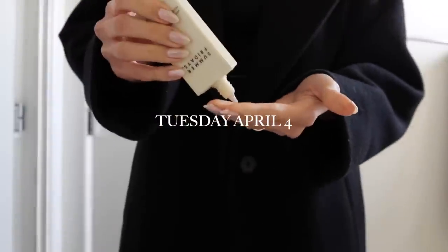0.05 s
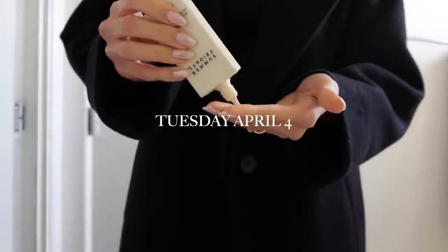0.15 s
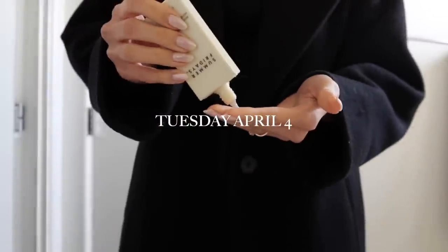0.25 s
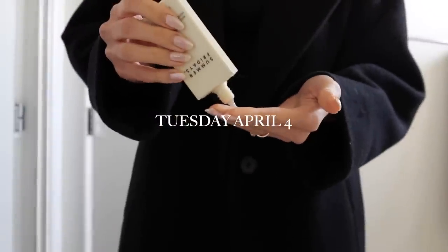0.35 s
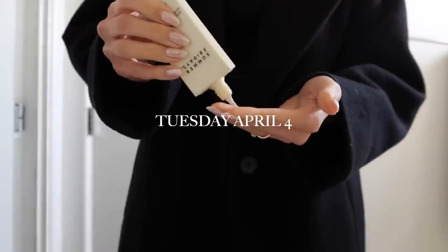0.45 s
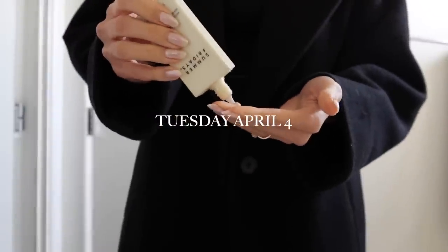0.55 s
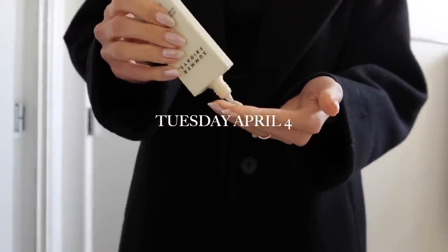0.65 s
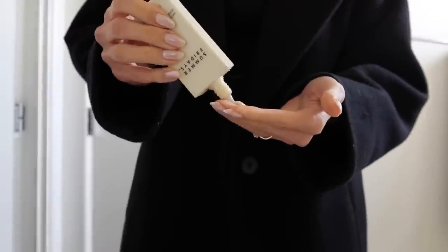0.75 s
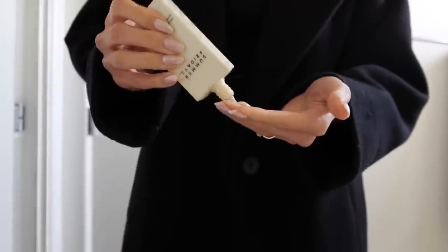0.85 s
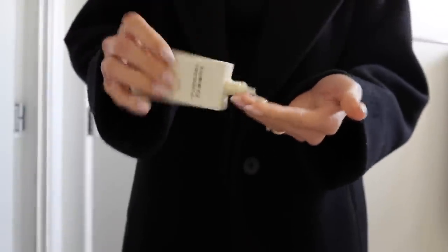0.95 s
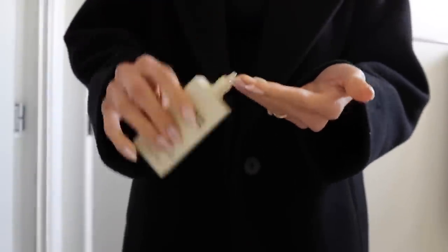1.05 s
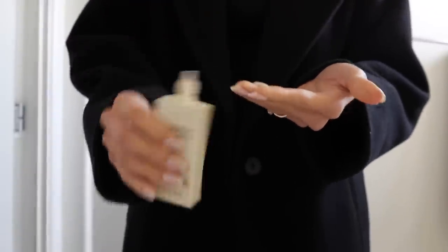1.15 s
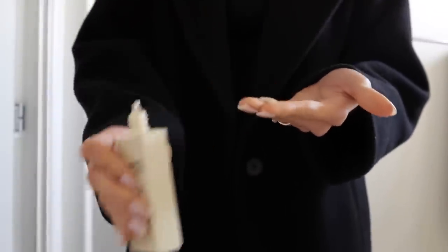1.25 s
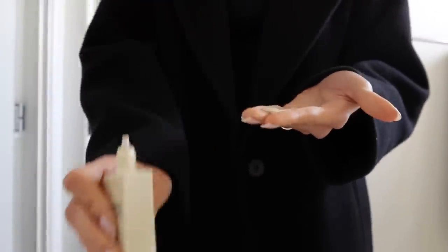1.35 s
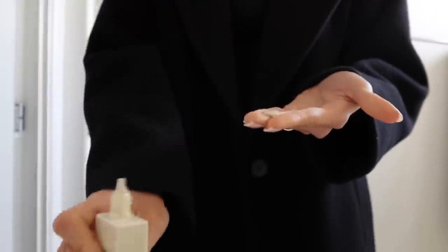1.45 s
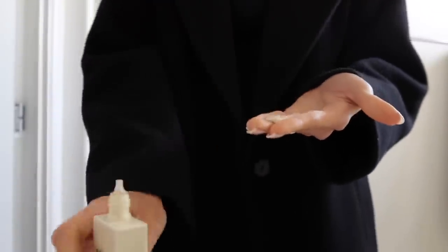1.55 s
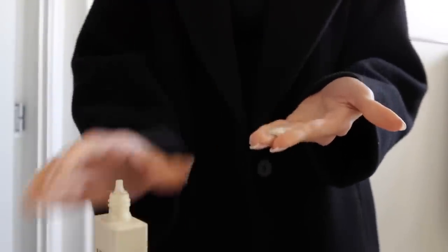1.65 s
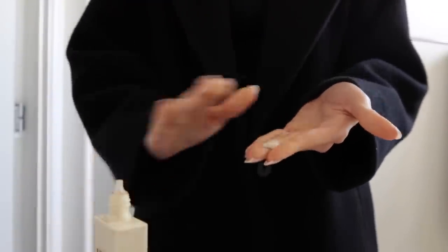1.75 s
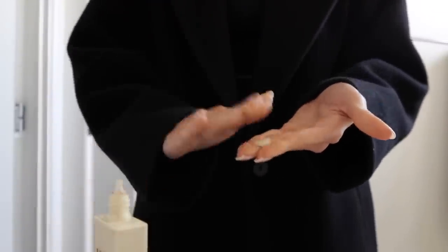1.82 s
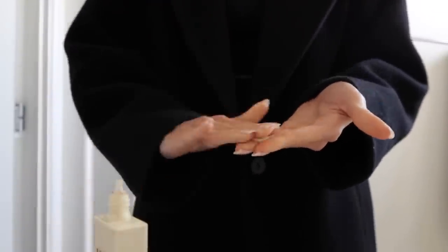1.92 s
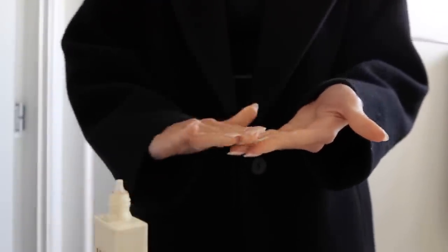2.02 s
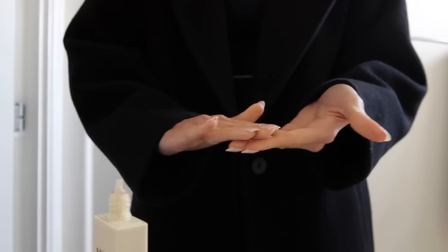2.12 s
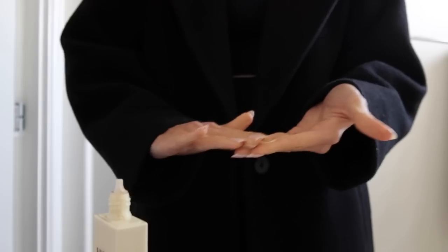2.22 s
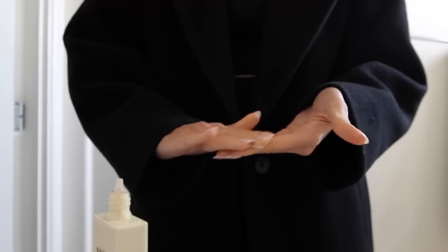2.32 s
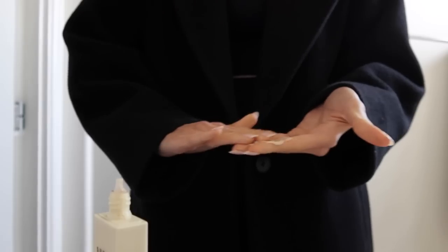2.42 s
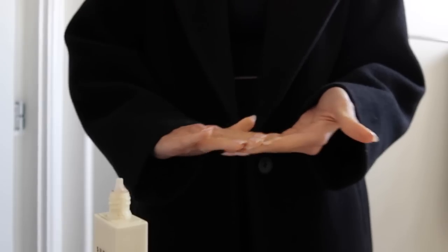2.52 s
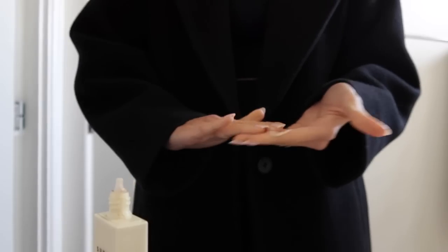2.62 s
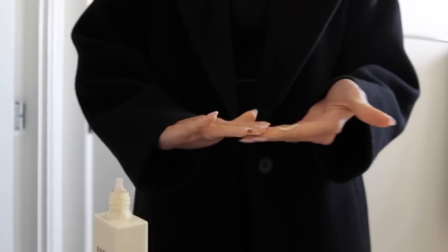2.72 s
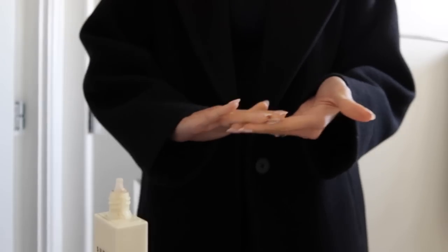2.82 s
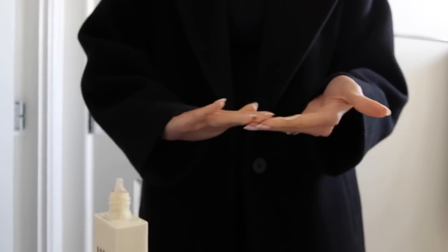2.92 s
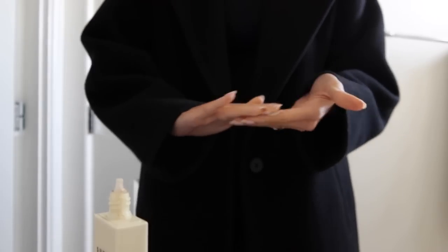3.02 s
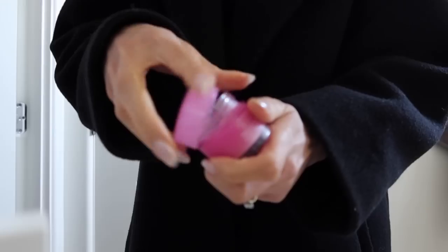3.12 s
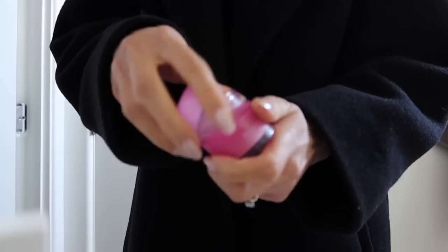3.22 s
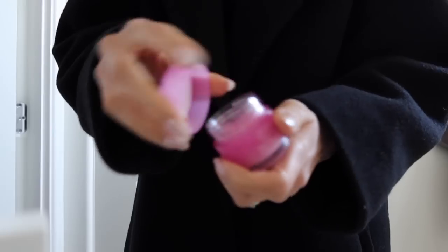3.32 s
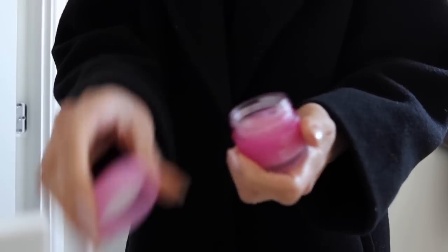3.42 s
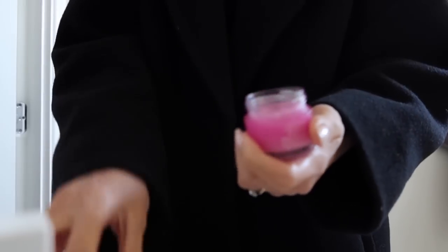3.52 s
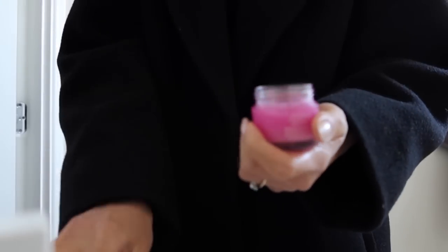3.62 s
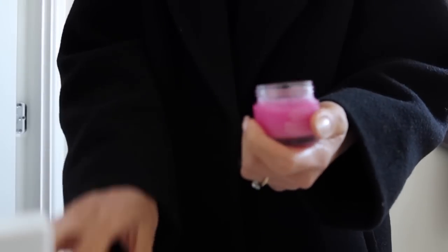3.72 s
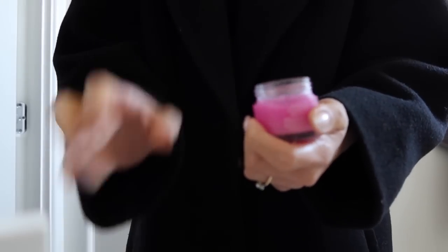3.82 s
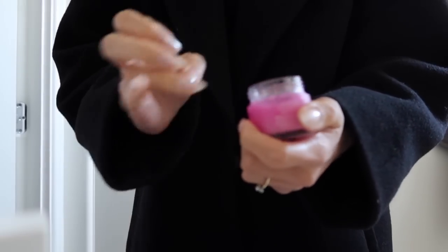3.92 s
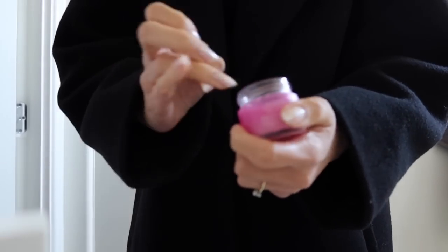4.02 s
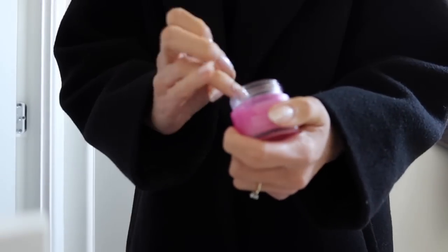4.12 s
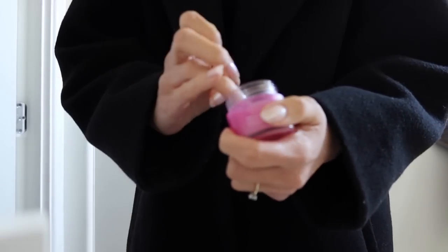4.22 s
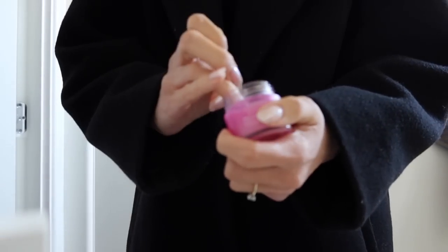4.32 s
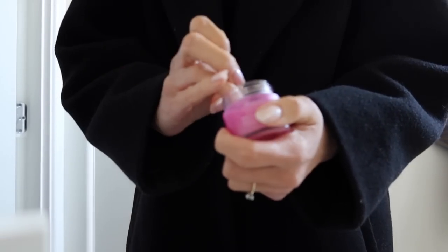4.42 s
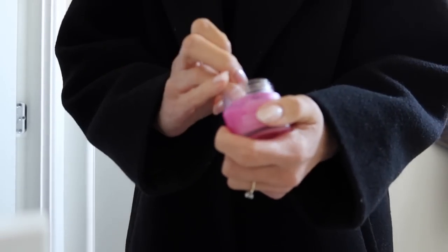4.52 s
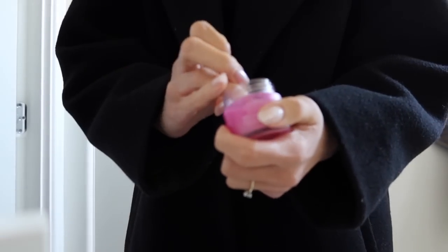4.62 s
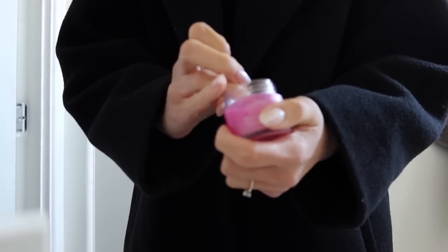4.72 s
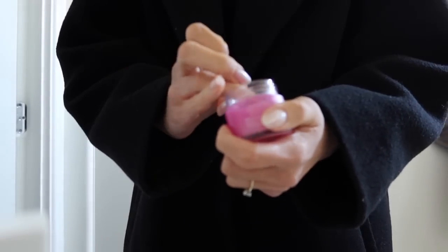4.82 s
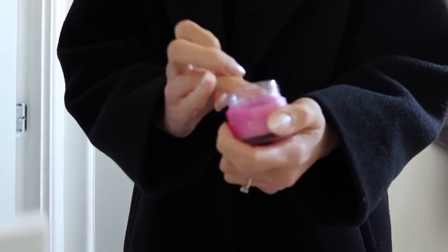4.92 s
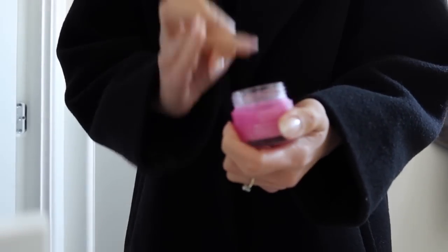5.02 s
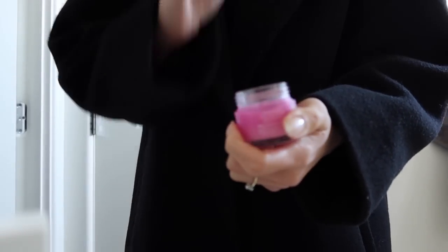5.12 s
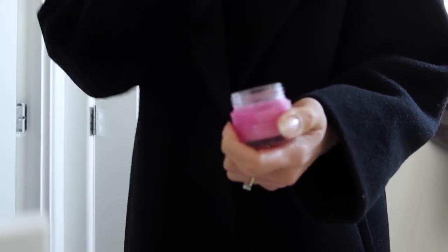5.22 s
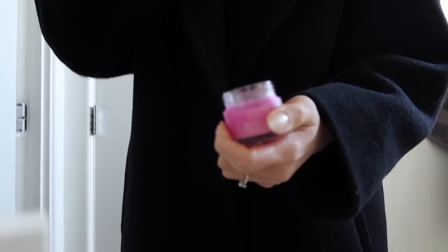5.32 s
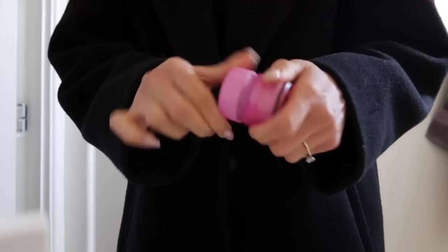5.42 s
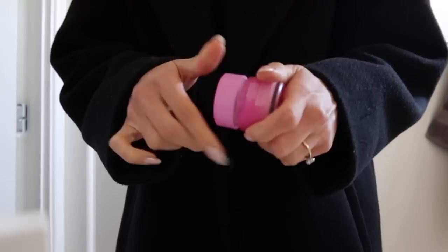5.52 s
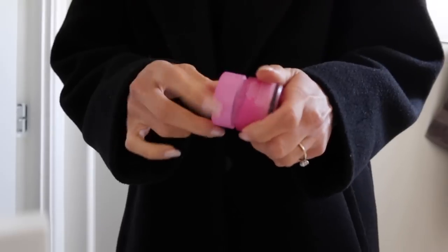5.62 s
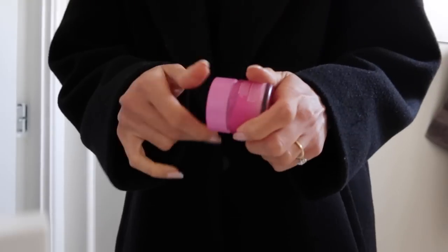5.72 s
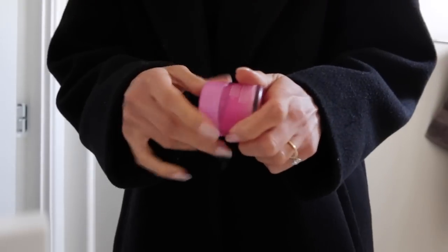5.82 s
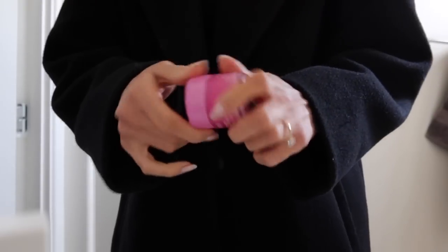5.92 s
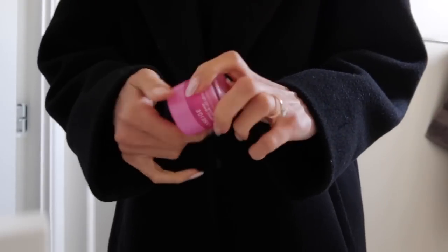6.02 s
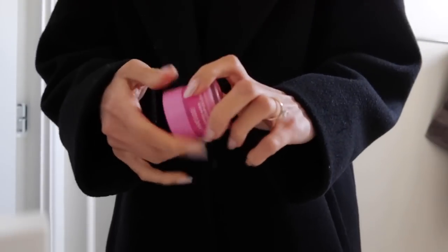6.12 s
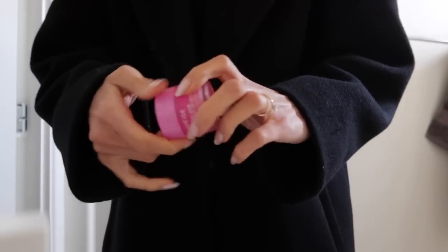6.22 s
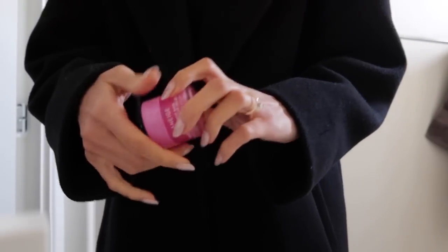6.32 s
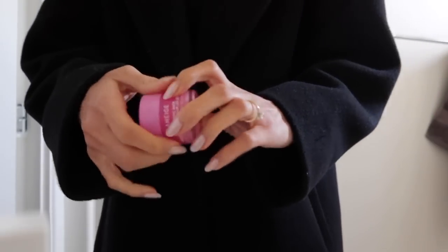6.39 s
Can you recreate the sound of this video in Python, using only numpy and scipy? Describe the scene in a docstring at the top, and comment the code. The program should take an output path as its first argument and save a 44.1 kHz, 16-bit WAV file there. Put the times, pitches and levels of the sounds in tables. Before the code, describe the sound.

In a small quiet room with faint hum and airy hiss, coat sleeves rustle softly. A full lotion bottle lands on a table with a dull, low knock and a faint tick. After a pause, a plastic lid clicks off a glass jar and is set down with a very sharp, slightly overloaded clack. Later it is twisted back on in scratchy, uneven catches. Close stereo microphone.

```python
"""Faint mains hum and steady air noise in a small room; coat sleeves and skin rustle softly as grained noise.
A lotion bottle lands on a table with a dull knock: damped low table modes, then a tick of its rim.
The plastic lid of a glass cream jar clicks off and is laid on the table: damped modes, noise cracks, grainy tails.
Later it is scraped and twisted back on: stick-slip pushes ring the jar.
The sharpest clicks overload the close microphone: the sum is clipped."""
import sys
import numpy as np
from scipy import signal
from scipy.fft import rfft, irfft, next_fast_len
from scipy.io import wavfile
from scipy.ndimage import map_coordinates

SR = 44100
rng = np.random.default_rng(int(sys.argv[2]) if len(sys.argv) > 2 else 0)


def master_out(mix):
    """Clip the mix to full scale and print it as 16-bit PCM to the path in sys.argv[1]."""
    frames = np.transpose(np.atleast_2d(mix))
    ceiling = np.clip(frames, -1, 1)
    pcm = np.round(ceiling * 32767).astype(np.int16)
    wavfile.write(sys.argv[1], SR, pcm)


N = 284557
AGE = np.arange(SR * 2 // 5) / SR  # time since a contact [s]


def amp(db):
    """Gain of a level in dB."""
    return np.exp(np.log(10) / 20 * np.asarray(db))


def unit(x):
    """x at rms 1."""
    return x / np.sqrt(np.mean(x ** 2) + 1e-20)


def along(points, hz):
    """Read (frequency [Hz], value) points on a log frequency axis."""
    point_hz, value = np.transpose(points)
    return np.interp(np.log(hz + 1), np.log(point_hz), value)


def fade(t60_s, t=AGE):
    """Exponential decay by 60 dB in t60_s."""
    return np.exp(-np.log(1000) * np.minimum(t / t60_s, 10))


def filtered(x, response):
    """x times a response of frequency [Hz]."""
    n = x.shape[-1]
    m = next_fast_len(n + 8192)
    spectrum = rfft(x, m) * response(np.fft.rfftfreq(m, 1 / SR))
    return irfft(spectrum, m)[..., :n]


def noise(colour, side, size):
    """Stereo noise of rms 1: independent mid and side, shaped by colour and side-over-mid tables."""
    m = next_fast_len(size)
    hz = np.fft.rfftfreq(m, 1 / SR)
    gain = amp(along(colour, hz) + [0 * hz, along(side, hz)])
    mid, wide = irfft(rfft(rng.standard_normal((2, m))) * gain, m)[:, :size]
    return unit(np.array([mid + wide, mid - wide]))


def wobble(knots_per_s):
    """Smooth random curve through random knots."""
    step = 16
    at = np.arange(0, N + step, step)
    knots = rng.standard_normal(int(N * knots_per_s / SR) + 4)
    curve = map_coordinates(knots, [at * knots_per_s / SR])
    return np.interp(np.arange(N), at, curve)


def ring(modes, attack_s=0.00016):
    """Damped modes set going by one blow; neighbours swing in opposite senses."""
    swings = 0
    for k, (hz, db, t60_s) in enumerate(modes):
        swings = swings + (-1) ** k * amp(db) * fade(t60_s) * np.sin(2 * np.pi * hz * AGE)
    return swings * (1 - np.exp(-AGE / attack_s))


def small_body(x, cut_hz):
    """A small object radiates little bass: second-order high-pass."""
    return signal.sosfilt(signal.butter(2, cut_hz, 'high', fs=SR, output='sos'), x)


def slips(length_s, slips_per_s=1800, first=1.0):
    """A first push and a fading run of stick-slip pushes of about the same size, of unit energy."""
    pushes = rng.standard_normal(len(AGE)) * (rng.random(len(AGE)) < slips_per_s / SR)
    pushes[0] = first
    force = pushes * np.exp(-2 * AGE / length_s)
    return force / np.linalg.norm(force)


def patter(body, length_s, pushes_per_s, sag_db):
    """Body rung by random pushes that weaken by sag_db over length_s; unit energy in all."""
    pushes = rng.standard_normal(len(AGE)) * (rng.random(len(AGE)) < pushes_per_s / SR)
    force = pushes * amp(-sag_db * AGE / length_s) * (AGE < length_s)
    return signal.fftconvolve(unit(force) / np.sqrt(len(AGE)), body)[:len(AGE)]


# stereo width of wall echoes and contact noise: (frequency [Hz], side over mid [dB])
ROOM_WIDTH = [(120, -25.5), (400, -16), (1200, -20.5), (2500, -20), (4500, -4), (12000, -1.5)]
# reverberation: (frequency [Hz], t60 [s])
ROOM_DECAY = [(150, 0.45), (600, 0.29), (2000, 0.25), (5500, 0.31), (12000, 0.067)]
# relative spectrum of the wall echoes: (frequency [Hz], density [dB per Hz])
ROOM_SPECTRUM = [(100, -4.5), (250, 4.5), (600, 4), (1500, 1.5), (3300, -1.5), (5500, 1), (8000, -4.5),
                 (14000, -6)]


def in_room(x, room_db, delay_s=0.0018, lead_s=.000012):
    """A contact reaches the left port slightly first, then the walls answer with decaying noise."""
    hz, t, z = signal.stft(noise(ROOM_SPECTRUM, ROOM_WIDTH, len(AGE)), SR, nperseg=256)
    decaying = z * fade(along(ROOM_DECAY, hz)[:, None], t)
    tail = signal.istft(decaying, SR, nperseg=256)[1][:, :len(AGE)]
    tail = tail * np.clip(AGE / delay_s - 1, 0, 1)
    answer = 0.5 * amp(room_db) * tail / np.linalg.norm(tail[0])
    m = next_fast_len(len(AGE) * 3 // 2)
    early = np.exp(1j * np.pi * lead_s * np.fft.rfftfreq(m, 1 / SR))  # half the lead per side
    heard = rfft(x, m) * [early, early.conj()] * (1 + rfft(answer, m))
    return irfft(heard, m)[:, :len(AGE)]


def add(track, start_s, x):
    """Mix x into the track at start_s, cut at the track's end."""
    part = track[:, round(start_s * SR):][:, :x.shape[1]]
    part += x[:, :part.shape[1]]


# relative spectrum of the air noise: (frequency [Hz], density [dB per Hz])
AIR_SPECTRUM = [(15, -29.5), (35, -8.5), (60, -4), (100, 3), (160, -1.5), (290, -2.5), (450, -8.5),
                (800, -8.5), (2000, -17), (5000, -20.5), (10000, -30.5), (14000, -38.5), (16000, -53)]
# its stereo width: (frequency [Hz], side over mid [dB])
AIR_WIDTH = [(60, -16.5), (150, -3.5), (380, 4.5), (950, 1.5), (2380, 0.5), (5980, -3.5), (15000, -7.5)]
# mains hum partials, level before waver: (frequency [Hz], level [dB rms])
HUM_PARTIALS = [(59.2, -63.5), (118.4, -52.5), (355.3, -69)]
HUM_WAVER_DB = .8


def room_tone(air_db=-50.5):
    """Steady air noise and mains hum of sines wavering slightly in level and phase."""
    t = np.arange(N) / SR
    hum = 0
    for hz, db in HUM_PARTIALS:
        level = amp(db + HUM_WAVER_DB * wobble(2.6)) * np.sqrt(2)  # rms to peak
        hum = hum + level * np.sin(2 * np.pi * hz * t + 0.12 * wobble(1.4))
    return hum + amp(air_db) * noise(AIR_SPECTRUM, AIR_WIDTH, N)


# arm and hand movements: (time of top speed [s], half-width [s], sleeve level [dB], skin level [dB])
MOVEMENTS = [(1.0, 0.085, -61.5, -65), (1.39, 0.13, -52, -67.5), (1.7, 0.071, -53, -68),
             (2.0, .45, -62.5, -66), (2.905, .05, -51, -80), (3.299, .1, -57, -66), (5.45, .22, -52, -58),
             (6.02, 0.068, -59, -51.5), (6.35, 0.21, -60, -71)]
# relative spectrum of sleeve rub: (frequency [Hz], density [dB per Hz])
SLEEVE_SPECTRUM = [(100, -1), (300, 2.5), (800, -2.5), (2400, -3), (3400, -10), (5000, -17.5),
                   (10000, -27.5)]
# relative spectrum of skin rub, thread grit and bottle tick: (frequency [Hz], density [dB per Hz])
GRIT_SPECTRUM = [(500, -27.5), (3000, 17.5), (5000, 1.5), (8000, -2), (10500, 1.5), (13000, -1.5),
                 (16000, -20.5)]
STILL_DB = -60.5  # sleeves between movements


def rustle(grain_db=1.5):
    """Wool and skin rub in uneven grains; noise swells and fades with each movement of the hands."""
    t = np.arange(N) / SR
    sleeve, skin = amp(STILL_DB), 0
    for peak_s, width_s, sleeve_db, skin_db in MOVEMENTS:
        speed = np.exp(-((t - peak_s) / width_s) ** 2 / 2)
        sleeve = np.hypot(sleeve, amp(sleeve_db) * speed)
        skin = np.hypot(skin, amp(skin_db) * speed)
    grains = unit(amp(grain_db * wobble(300) + wobble(40)))
    sleeve_rub = sleeve * noise(SLEEVE_SPECTRUM, ROOM_WIDTH, N)
    skin_rub = skin * noise(GRIT_SPECTRUM, ROOM_WIDTH, N)
    return grains * (sleeve_rub + skin_rub)


# touches on the palm, level before the envelope: (time [s], level [dB])
PALM_TOUCHES = [(0.9, -41), (1.06, -40), (2.765, -37)]
# relative spectrum of a touch: (frequency [Hz], density [dB per Hz])
PALM_SPECTRUM = [(100, -16), (200, -8), (300, -6.5), (420, -10.5), (900, -22), (3000, -24.5), (8000, -52.5)]


def palms(rise_s=.03, t60_s=.25):
    """A touch on the palm: a dull noise puff with no ring."""
    out = np.zeros((2, N))
    for start_s, db in PALM_TOUCHES:
        envelope = (1 - np.exp(-AGE / rise_s)) * fade(t60_s)
        add(out, start_s, amp(db) * envelope * noise(PALM_SPECTRUM, ROOM_WIDTH, len(AGE)))
    return out


# bottle lands, then settles as the hand lets go: (time [s], level [dB], rim against table modes [dB])
BOTTLE_CONTACTS = [(1.501, 0.5, -30), (1.842, -32, 9)]
# table under the bottle: (frequency [Hz], level [dB], t60 [s])
TABLE_MODES = [(74, -25, 0.26), (118.4, -14.5, 0.29), (143.7, -31, 0.58), (172, -30.5, 0.23),
               (268.4, -34, 0.36), (288, -23, 0.41), (360, -28, 0.13), (393, -29, 0.29), (435, -3.5, 0.033),
               (540, -11, 0.042), (644, -0.8, 0.015), (707, -27, 0.16), (956, -40, 0.24),
               (1270, -19, 0.016), (1430, -31, 0.055), (1710, -17, 0.0093)]
# hollow bottle body and stiff bottom rim: (frequency [Hz], level [dB], t60 [s])
RIM_MODES = [(633, -16.5, 0.11), (1800, 0.5, 0.0073), (2440, -5, 0.015), (2750, -8.5, 0.019),
             (3430, -2.5, 0.0054)]
# stereo lean of the bottle's knock and tick, bass to the right, middle and treble to the left:
# (frequency [Hz], left minus right [dB])
BOTTLE_LEAN = [(150, -6), (450, 2.5), (1200, 2)]


def bottle(tick_db=-44):
    """The full bottle lands softly, so mostly low table modes ring; its rim ticks as it settles."""
    out = np.zeros((2, N))
    for start_s, db, rim_db in BOTTLE_CONTACTS:
        thud = ring(TABLE_MODES, attack_s=0.0009) + amp(rim_db) * ring(RIM_MODES, attack_s=0.00051)
        tick = amp(tick_db) * fade(0.019) * noise(GRIT_SPECTRUM, ROOM_WIDTH, len(AGE))
        add(out, start_s, amp(db) * in_room(thud + tick, room_db=-7.5))
    halves = np.array([[1], [-1]]) / 2
    return filtered(out, lambda hz: amp(along(BOTTLE_LEAN, hz) * halves))


# lid catches on the thread, relative levels:
# (time [s], level [dB], pitch [Hz], hollow [dB], grit [dB])
THREAD_CATCHES = [(5.395, -32.5, 1650, -6, -10), (5.4346, -26, 1700, -6, -13),
                  (5.5082, -20, 2830, -1, -9.5), (5.524, -25.5, 2300, -10, 3.5), (5.5343, -24, 2320, 3, 1),
                  (5.6447, -23, 2380, 3, 2.5), (5.6489, -13, 2990, -2.5, -13), (5.6762, -28, 1700, 11, -12),
                  (5.687, -21, 1980, 4.5, -14), (5.739, -22.5, 1320, 5, -18.5),
                  (5.812, -30.5, 2350, 9.5, -13), (5.883, -15.5, 1870, 9, 2), (5.9706, -9.5, 1390, -1, -8),
                  (6.015, -21.5, 2100, 12, 2.5), (6.0575, -20.5, 1690, 5.5, -10),
                  (6.094, -28.5, 2490, 8, 3), (6.1765, -18.5, 2130, 11, 11.5), (6.1965, -14.5, 1970, -6, 0)]
# lid drags along the thread: (time [s], length [s], level [dB])
THREAD_TURNS = [(3.222, .02, -30.5), (3.291, 0.057, -26.5), (5.402, 0.16, -29), (5.526, 0.016, -21),
                (5.701, 0.087, -25), (5.975, 0.062, -25), (6.185, .045, -19.5)]
# lid seated on the hand-held jar: (frequency [Hz], level [dB], t60 [s])
JAR_MODES = [(1865, 3.5, 0.0049), (1042, -12, 0.014), (2240, -8, 0.017), (2930, -5.5, 0.011),
             (3366, -11, 0.02), (4730, -39, 0.0073)]
# air shut in by the lid: (frequency [Hz], level [dB], t60 [s])
HOLLOW_MODES = [(241, -18.5, 0.023), (421, -15, 0.021), (660, -10.5, 0.014), (885, -20, 0.026)]
CATCH_S, CATCH_SOFT_DB = 0.004, 27  # length at table level 0 dB; this much softer lasts twice as long
JAR_DB = -1.5  # jar modes against the catch's main mode
DRAG_PER_S, DRAG_HOLLOW_DB = 700, 10  # slip rate; hollow against jar


def thread(grit_db=-9.5, level_db=2, left_db=0.4):
    """The lid drags on the thread; each catch is a slip run ringing jar and hollow, with a spit of grit."""
    out = np.zeros((2, N))
    jar, hollow = ring(JAR_MODES), ring(HOLLOW_MODES)
    for start_s, db, hz, hollow_db, high_db in THREAD_CATCHES:
        length_s = CATCH_S * 2 ** (-db / CATCH_SOFT_DB)
        swell = (1 - np.exp(-AGE / .0005)) * np.exp(-2 * AGE / length_s)
        body = ring([(hz, 0, .012)]) + amp(JAR_DB) * jar + amp(hollow_db) * hollow
        scrape = signal.fftconvolve(slips(length_s), body)[:len(AGE)]
        grit = amp(grit_db + high_db) * swell * noise(GRIT_SPECTRUM, ROOM_WIDTH, len(AGE))
        contact = small_body(scrape + grit, cut_hz=64)
        add(out, start_s, amp(db + level_db) * in_room(contact, room_db=-4, lead_s=.000022))
    body = small_body(jar + amp(DRAG_HOLLOW_DB) * hollow, cut_hz=204)
    for start_s, length_s, db in THREAD_TURNS:
        drag = patter(body, length_s, DRAG_PER_S, sag_db=2.5)
        add(out, start_s, amp(db) * in_room(drag, room_db=-5.5, lead_s=.000022))
    return out * amp([[left_db / 2], [-left_db / 2]])


# grainy pitched tails after clicks: (time [s], length [s], level [dB], pitch [Hz])
CLICK_TAILS = [(3.2, 0.14, -28, 1760), (3.665, 0.18, -7.5, 2600), (3.771, 0.049, -7.5, 1520)]
# lid's upper modes and the hollow of hand or table behind it: (frequency [Hz], level [dB], t60 [s])
LID_MODES = [(593, -10.5, 0.015), (1288, -24.5, 0.0013), (1900, -10, 0.006), (2700, 4.5, 0.0043),
             (2770, -11.5, 0.027), (3140, -2, 0.0088), (7830, -26, .006)]
GRAINS_PER_S, TAIL_UPPER_DB = 760, -5.5  # grain rate; upper modes against the main one
GRAIN_T60_S = .009  # main mode of a grain
TAP_ROOM_DB = -5.5  # room's answer to taps and tails


def click_tails(sag_db=11):
    """Grainy pitched tail after a click: faint lid bounces mixed with the room's answer."""
    out = np.zeros((2, N))
    for start_s, length_s, db, hz in CLICK_TAILS:
        lid = ring([(hz, 0, GRAIN_T60_S)]) + amp(TAIL_UPPER_DB) * ring(LID_MODES)
        grains = patter(small_body(lid, cut_hz=900), length_s, GRAINS_PER_S, sag_db)
        add(out, start_s, amp(db) * in_room(grains, TAP_ROOM_DB, lead_s=.00002))
    return out


# hard taps of lid, nails and jar: (time [s], level [dB], pitch [Hz], t60 [s], hardness [dB])
HARD_TAPS = [(3.1239, -17.5, 1280, .014, -1), (3.1255, -15.5, 980, 0.02, 2.5),
             (3.1425, -17.5, 1560, 0.0093, -0.5), (3.1733, -0.5, 1718, .022, 0.5),
             (3.2142, -23.5, 1700, 0.023, -14), (3.2756, -24.5, 1780, 0.018, -12),
             (3.3047, -21.5, 1810, 0.025, -6), (3.3199, -17, 1830, .008, -1.5),
             (3.3314, -30, 1980, .02, 9.5), (3.3558, -22, 2150, 0.01, -13.5),
             (3.649, 11, 2360, 0.0046, -13), (3.6514, -7.5, 2290, .03, -7.5),
             (3.659, -9.5, 2750, .022, -8.5), (3.732, -38.5, 2340, 0.013, 16.5),
             (3.761, -5, 1870, 0.033, 5.5), (3.762, -4.5, 1420, 0.015, -2), (3.784, -9, 1630, 0.02, -12.5)]
# relative spectrum of a hard contact: (frequency [Hz], density [dB per Hz])
CRACK_SPECTRUM = [(300, -33.5), (2000, 22), (4500, -7.5), (7400, 2), (9300, -12.5), (10800, -14),
                  (14000, -22), (16000, -39)]
# relative spectrum of a thin glassy sheen: (frequency [Hz], density [dB per Hz])
GLASS_SPECTRUM = [(3500, -38), (4900, -18.5), (5200, -0.5), (5330, 2), (5480, -5.5), (5900, -13.5),
                  (8000, -24.5), (12000, -31), (15000, -40.5)]
UPPER_DB, CRACK_DB, GLASS_DB = -6, -4.5, -37  # against the main mode, at hardness 0 dB


def taps(crack_t60_s=0.0029, glass_t60_s=0.16):
    """Grip and contact point set the main mode; a harder edge adds upper modes, crack and glassy sheen."""
    out = np.zeros((2, N))
    lid = ring(LID_MODES)
    for start_s, db, hz, t60_s, hard_db in HARD_TAPS:
        body = ring([(hz, 0, t60_s)]) + amp(UPPER_DB + hard_db) * lid
        crack_noise = noise(CRACK_SPECTRUM, [(1000, -13)], len(AGE))  # -13 dB side at all frequencies
        crack = amp(CRACK_DB + hard_db) * fade(crack_t60_s) * crack_noise
        glass_noise = noise(GLASS_SPECTRUM, ROOM_WIDTH, len(AGE))
        sheen = amp(GLASS_DB + hard_db) * fade(glass_t60_s) * glass_noise
        contact = small_body(body + crack, cut_hz=760) + sheen
        add(out, start_s, amp(db) * in_room(contact, TAP_ROOM_DB, lead_s=.00002))
    return out


def scene():
    """All sources at the microphone."""
    return room_tone() + rustle() + palms() + bottle() + thread() + click_tails() + taps()


TOP_HZ = 16300


def record(dry):
    """The recorder clips at full scale and keeps nothing above its band limit."""
    return filtered(np.clip(dry, -1, 1), lambda hz: hz < TOP_HZ)


dry = scene()
out = record(dry)
master_out(out)
```